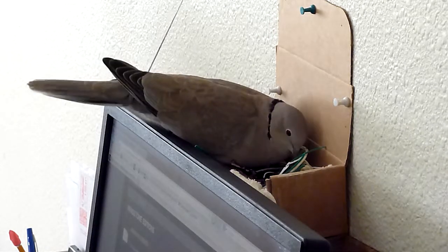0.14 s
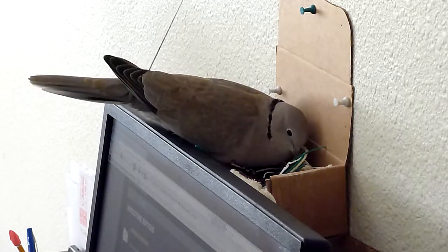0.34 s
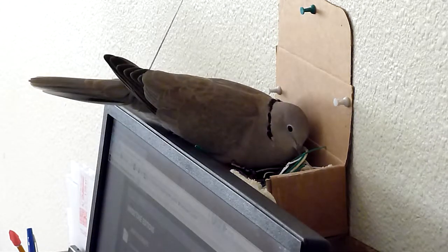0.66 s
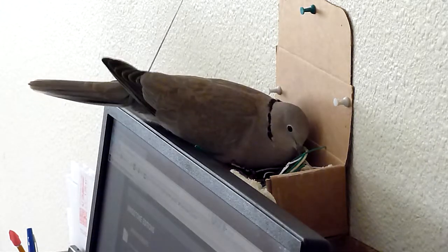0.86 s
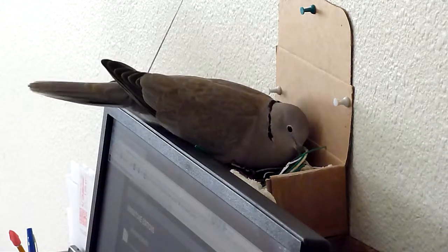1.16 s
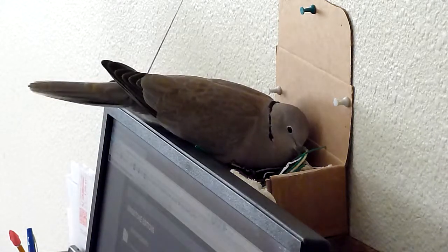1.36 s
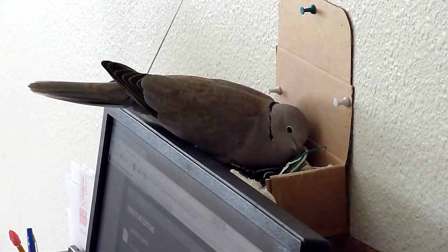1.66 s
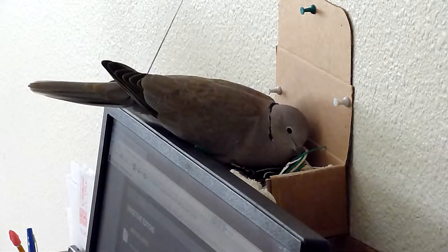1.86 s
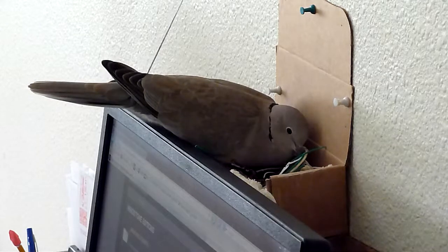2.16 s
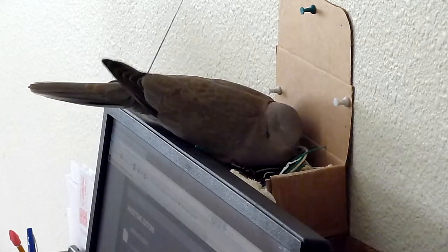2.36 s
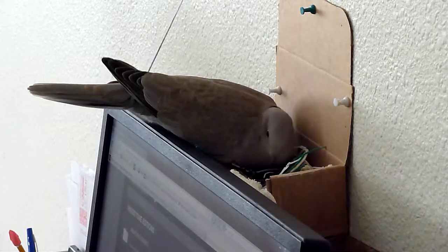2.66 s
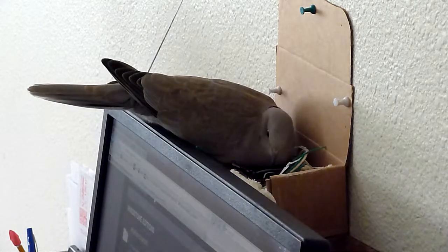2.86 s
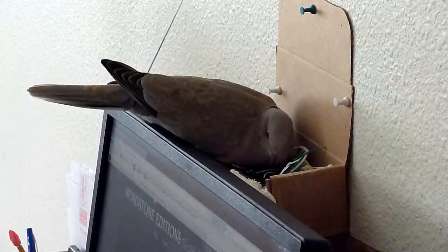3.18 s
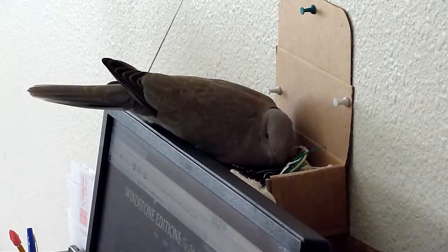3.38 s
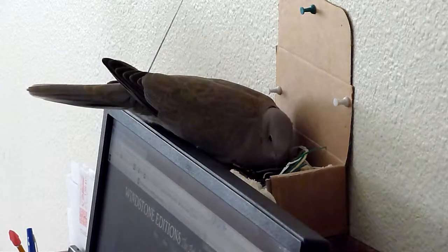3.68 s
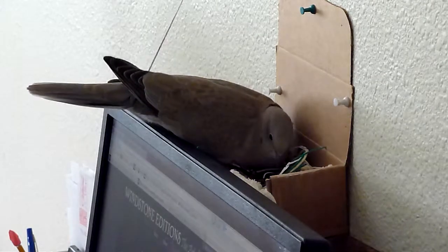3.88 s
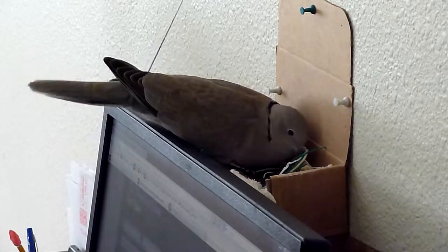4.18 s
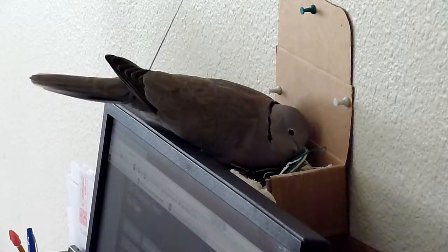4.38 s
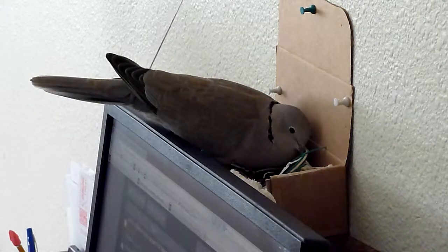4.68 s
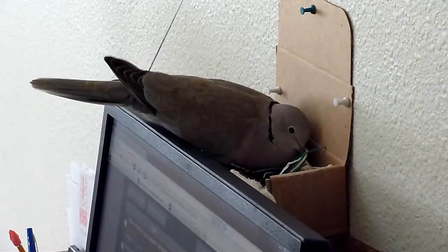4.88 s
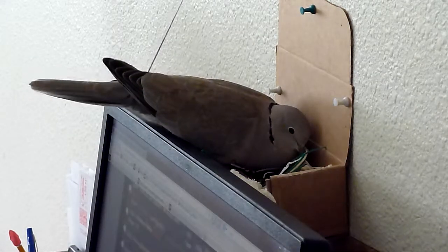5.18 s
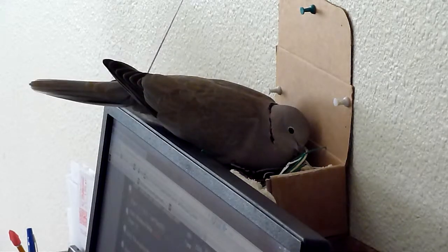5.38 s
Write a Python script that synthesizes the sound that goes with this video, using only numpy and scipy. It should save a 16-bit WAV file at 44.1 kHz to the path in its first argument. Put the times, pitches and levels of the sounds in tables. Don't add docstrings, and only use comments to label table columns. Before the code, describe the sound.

Close stereo sound in a small, hard-walled room with a quiet, steady airy hum and slight hiss. A dove is already cooing at the start: the end of a short note until about 0.1 s, a long held note from 0.15 to 0.75 s, and a short closing note near 1.0 s. The tone is round, hollow and almost pure, around 550 Hz, scooping up at the onset and dropping at the end, its level rippling with echoes and the room ringing briefly afterwards. A mouse button clicks down and up at 0.53 and 0.66 s, again at 1.46 and 1.6 s. Sharper, brighter snaps come at 2.7 and 2.78 s, slightly left, then a barely audible tap at 2.87 s. The hum swells gently around 3.15 s; a dull, more distant knock falls at 3.45 s. The second coo follows: short at 4.0, long from 4.2 to 4.8, short at 5.0 s, then fading ring and hum.

```python
import sys
import numpy as np
from scipy import signal
from scipy.io import wavfile
from scipy.ndimage import uniform_filter1d

SR = 44100
rng = np.random.default_rng(int(sys.argv[2]) if len(sys.argv) > 2 else 0)


def voltage_ratio(level):
    return 10 ** (np.asarray(level, float) / 20)


def unload_wav(signal):
    wavfile.write(
        sys.argv[1],
        SR,
        np.round(np.clip(np.atleast_2d(signal).T, -1, 1) * 32767).astype(np.int16),
    )


N = 244314

# start_s, length_s, level_db, held_pitch_hz, slow_arch_hz
FIRST_SHORTS = [
    (-.07, .168, -13.3, 550, 4),
    (3.977, .159, -13.8, 557, 4),
]
LONG_COOS = [
    (.157, .606, -17.2, 555, 24),
    (4.203, .588, -15.8, 543, 6),
]
LAST_SHORTS = [
    (.965, .139, -13.3, 545, 4),
    (5.01, .128, -13.2, 537, 4),
]
# rise_s, fall_s, end_drop_hz, half_pitch_voice_db
FIRST_SHORT_GLIDE = (.037, .006, 65, -42)
LONG_COO_GLIDE = (.021, .044, 180, -88)
LAST_SHORT_GLIDE = (.0155, .016, 195, -88)
# pitch_multiple, level_db
OVERTONES = [(2, 1), (3, -15), (4, -6.5), (5, -22), (6, -11.5), (8, -19)]
# pitch_multiple, level_db
HALF_TONES = [(.5, -4.5), (1.5, 7), (2.5, -13), (3.5, -22)]
# pitch_hz, width_hz, level_db
THROAT = [(390, 100, -8), (540, 90, 0), (650, 100, 1.5), (950, 300, -19.5)]
# pitch_hz, rising_change_db, falling_change_db, half_width_hz
ECHO_NOTCHES = [(466, -18, -9, 13), (512, -6, -.3, 8), (497, -.3, -11, 5)]
# time_s, change_db, half_width_ms
ECHO_DIPS = [(-.003, -2.5, 4), (.013, 3, 7), (.036, -22, 9), (.057, -8, 13), (.216, 6, 10), (.252, -30, 16),
             (.306, -4.5, 9), (.41, -3.5, 24), (.553, -10, 19), (.607, 4.5, 16), (.637, -14, 5),
             (.668, 3, 16), (.7, 5, 5), (1.026, -13, 5), (1.039, -13, 8), (4.066, -19, 5), (4.086, -10, 11),
             (4.264, 2.5, 12), (4.298, -8, 13), (4.338, 1.5, 14), (4.41, -7.5, 13), (4.468, -4.5, 12),
             (4.514, -2, 6), (4.557, -3, 9), (4.635, 2.5, 18), (4.669, -6, 6), (4.702, 3, 14),
             (4.737, 4, 5), (5.064, 1.5, 8), (5.102, -4, 9)]

# pitch_hz, decay_60db_s, level_db
ROOM_MODES = [(380, .35, -24), (440, .5, -22.5), (522, 1, -18), (545, 0.18, -26.5), (715, 0.18, -14.5)]
# start_s, level_db, pitch_hz, decay_60db_s
BEATING_RINGS = [(.096, -18.5, 536.5, 0.33), (0.094, -37.5, 516.5, 0.74), (.715, -35.5, 537, .5),
                 (.715, -44, 525, 0.53), (1.086, -17.5, 541, 0.28), (1.0869, -35, 536, 0.7),
                 (4.136, -30.5, 536.5, 0.71), (4.136, -31, 545, 0.39), (4.755, -32, 536.3, 0.43),
                 (4.754, -39, 523.5, 0.45), (5.11, -11.5, 523.6, 0.12), (5.1106, -24.5, 533, 0.5)]
# frequency_hz, decay_60db_s
ROOM_DECAY = [(150, 0.41), (500, 0.65), (1200, 0.59), (3000, 0.29), (7000, 0.32), (14000, 0.084)]

# frequency_hz, level_db_per_hz
HUM_COLOR = [(12, -48.5), (20, -18), (172, -9.5), (204, 8), (228, -13), (377, -4), (433, -11.5), (471, -7),
             (606, -9), (947, -10.5), (1030, -9.5), (1180, -11.5), (4050, -18.5), (11100, -26.5),
             (16000, -33)]
# frequency_hz, likeness (1 is identical)
HUM_LIKENESS = [(30, .7), (70, 0.2), (130, 0.5), (290, -0.2), (640, -0.4), (1410, -0.64), (3100, -0.58),
                (6820, -.18), (15000, -0)]
# frequency_hz, left_minus_right_db
HUM_LEAN = [(30, 3.5), (70, 2.5), (200, 2), (700, 0), (1300, -1), (15000, -0.5)]

# start_s, peak_db, pan_db
MOUSE_PRESSES = [
    (.5283, -29.5, -5),
    (1.464, -32.5, -2),
]
MOUSE_RELEASES = [
    (0.6579, -31.5, -7),
    (1.6053, -30.5, -4),
]
MOUSE_SNAPS = [
    (2.6894, -38, -5.5),
    (2.692, -29, -10),
    (2.7745, -27.5, -8),
    (2.7795, -31, 1.5),
]
TAPS = [
    (2.873, -42, 0),
]
KNOCKS = [
    (3.45, -33.5, .5),
]
# pitch_hz, level_db, width_hz
PRESS_SHELL = [(800, -7, 500), (2440, -13, 400), (4000, -13, 1000), (5400, -8, 900), (6500, -14, 1000),
               (7460, 3, 200), (8500, -13, 1500), (11700, -17, 2500), (13100, -14, 800), (15200, -12, 1500)]
RELEASE_SHELL = [(650, -1, 200), (1000, -4, 500), (1600, -7, 500), (2710, -8, 600), (5170, -3, 450),
                 (6070, -9, 900), (7460, -8, 600), (9000, -14, 2000), (11300, -7, 700), (13900, -1, 600),
                 (15400, -7, 1000)]
SNAP_SHELL = [(1400, -17, 600), (3700, -10, 1600), (5800, -6, 1400), (7300, -1, 1200), (8700, 0, 1800),
              (10500, -1, 2200), (12200, -4, 2200), (14600, -6, 2800)]
KNOCK_SHELL = [(120, -11, 90), (226, 0, 90), (360, -3, 160), (540, -3, 260), (800, -8, 400),
               (1300, -10, 600), (2000, -12, 900), (2900, -13, 1000)]


def evened(x):
    return x / np.sqrt(np.mean(x ** 2) + 1e-20)


def bell(x, at, width):
    return np.exp(-.5 * ((x - at) / width) ** 2)


def read(points, hz):
    f, value = np.transpose(points)
    return np.interp(np.log(hz + 1), np.log(f + 1), value)


def add(mix, start_s, sound):
    part = mix[..., round(start_s * SR):][..., :sound.shape[-1]]
    part += sound[..., :part.shape[-1]]


def resonate(x, hz, width_hz):
    pole = np.exp((2j * np.pi * hz - np.pi * width_hz) / SR)
    return 2 * signal.lfilter([1 - abs(pole)], [1, -pole], x).real


def ports(x, pan_db):
    left = x * voltage_ratio(pan_db / 2)
    right = np.roll(x, 7) * voltage_ratio(-pan_db / 2)
    return np.array([left, right])


def room(x, apart, pan_db, damping):
    size = SR // 2
    slots = np.arange(60, size - 20, 20)
    at = slots + rng.integers(0, 20, (3, len(slots)))
    echoes = np.zeros((3, size))
    np.put_along_axis(echoes, at, rng.choice([-1., 1.], at.shape), 1)
    hz, t, z = signal.stft(echoes, SR, nperseg=256)
    fading_db = -60 * t * damping / read(ROOM_DECAY, hz)[:, None]
    early_db = 1.7 * np.exp(-t / 0.037)
    tail = signal.istft(z * voltage_ratio(fading_db + early_db), SR, nperseg=256)[1]
    tail = ports(tail[0], pan_db) + apart * tail[1:]
    return signal.fftconvolve(x[None], tail / np.linalg.norm(tail[0]), axes=1)[:, :N]


def crop_swell(t, hz, late, tiring, level_db, air):
    floor, crop_hz = .075, 535
    steepness = 13 + (5.5 - 13) * late
    crop_gain = np.minimum(hz / crop_hz, 1) ** steepness
    swell = voltage_ratio(level_db) * (floor * (1 - late) + (1 - floor) * crop_gain)
    scatter = air[::-1]
    for _ in range(3):
        scatter = resonate(scatter, 95, 90)
    swell = swell * (1 + (.011 + .085 * tiring) * evened(scatter))
    for at, change_db, width_ms in ECHO_DIPS:
        swell = swell * (1 - (1 - voltage_ratio(change_db)) * bell(t, at, width_ms / 1000))
    for f, up_db, down_db, width_hz in ECHO_NOTCHES:
        notch_db = up_db + (down_db - up_db) * late
        swell = swell * (1 - (1 - voltage_ratio(notch_db)) * bell(hz, f, width_hz))
    return swell


def overtones(turn, hz, flat, tiring):
    flicker = rng.standard_normal((len(turn), 9))
    for _ in range(2):
        flicker = uniform_filter1d(flicker, 700, 0)
    flicker_db = 1.8 * evened(flicker).T
    slack = np.minimum(hz / 546, 1) ** 7 * (1 - .6 * tiring)
    tones = sum(voltage_ratio(db + flicker_db[k]) * slack ** (k - 2) * np.cos(k * turn) for k, db in OVERTONES)
    return voltage_ratio(-56.5 + 12 * flat) * tones


def half_tones(turn, left, level_db):
    tones = sum(voltage_ratio(db) * np.cos(k * turn) for k, db in HALF_TONES)
    return voltage_ratio(level_db) * np.clip((.07 - left) / .025, 0, 1) * tones


def breath(air, flat, tiring):
    rush = sum(voltage_ratio(db) * resonate(resonate(air, f, w), f, w) for f, w, db in THROAT)
    level_db = -49 - 1 * flat + 15 * tiring
    return voltage_ratio(level_db + 3.0) * evened(rush)


def syllable(row, glide):
    start, length, level_db, held_hz, arch_hz = row
    rise_s, fall_s, drop_hz, half_db = glide
    u = np.arange(0, length, 1 / SR)
    t, left = start + u, length - u

    scoop_hz = 195 * np.exp(-u / rise_s)
    arch = arch_hz * (np.exp(-u / .09) + np.exp(-left / .09))
    hz = held_hz - scoop_hz - arch - drop_hz * np.exp(-left / fall_s)
    waver = evened(uniform_filter1d(rng.standard_normal(len(t)), 400))
    turn = 2 * np.pi * np.cumsum(hz * (1 + 0.00071 * waver)) / SR

    late = np.clip(3 * u / length - 1, 0, 1)
    flat = np.clip(1 - hz / held_hz, 0, .2) / .2
    tiring = np.exp(-left / length / .3)
    air = rng.standard_normal(len(t))

    tone = crop_swell(t, hz, late, tiring, level_db, air) * np.cos(turn)
    tone = tone + overtones(turn, hz, flat, tiring) + half_tones(turn, left, half_db)
    sound = np.sqrt(2) * tone + breath(air, flat, tiring)
    fade = np.minimum(1, np.minimum(u / 0.005, left / (.006 + .6 * fall_s)))
    return max(start, 0), (fade * sound)[t >= 0]


def mode_ringing(voice):
    ring = sum(voltage_ratio(db) * resonate(voice, f, 1.53 / t60) for f, t60, db in ROOM_MODES)
    t = np.arange(SR // 2) / SR
    for start_s, db, hz, t60 in BEATING_RINGS:
        fading = voltage_ratio(db - 60 * t / t60) * (1 - np.exp(-t / .004))
        add(ring, start_s, np.sqrt(2) * fading * np.sin(2 * np.pi * hz * t))
    return ring


def dove():
    voice, pan_db = np.zeros(N), 1.8
    kinds = (FIRST_SHORTS, FIRST_SHORT_GLIDE), (LONG_COOS, LONG_COO_GLIDE), (LAST_SHORTS, LAST_SHORT_GLIDE)
    for rows, glide in kinds:
        for row in rows:
            add(voice, *syllable(row, glide))
    top = signal.sosfilt(signal.butter(4, 2500, "high", fs=SR, output="sos"), voice)
    voice = signal.sosfilt(signal.butter(4, 2500, fs=SR, output="sos"), voice)
    ring = mode_ringing(voice)
    haze = voice - 0.8 * resonate(voice, 542, 90)
    return top + ports(voice + ring, pan_db) + voltage_ratio(-7.5) * room(haze, .06, pan_db, 1.14)


def hum():
    frames, hz = N // 256 + 5, np.fft.rfftfreq(1024, 1 / SR)
    a, b, c, d, patches = rng.standard_normal((frames, 513, 5)).T
    patches = evened(uniform_filter1d(uniform_filter1d(patches, 12, 0), 14, 1))
    same = np.clip(read(HUM_LIKENESS, hz), -1, 1)[:, None]
    lean = voltage_ratio(read(HUM_LEAN, hz) / 2)[:, None]
    left = a + 1j * b
    right = same * left + np.sqrt(1 - same ** 2) * (c + 1j * d)
    z = np.array([left * lean, right / lean])
    z *= voltage_ratio(read(HUM_COLOR, hz)[:, None] + 0.98 * patches)
    noise = signal.istft(z, nperseg=1024, noverlap=768)[1][:, :N]
    swell_db = 2.1 * bell(np.arange(N) / SR, 3.15, .35)
    return voltage_ratio(-55 + 4.0 + swell_db) * evened(noise)


def shell_response(shell):
    hz = abs(np.fft.fftfreq(4096, 1 / SR))
    power = sum(voltage_ratio(2 * db) / (1 + ((hz - f) / width) ** 2 * 2) ** 3 for f, db, width in shell)
    log_gain = np.log(power + 1e-9) / 2
    phase = signal.hilbert(log_gain).imag
    return np.fft.ifft(np.exp(log_gain - 1j * phase)).real[:2048]


def strikes(events, shell, wet_db, rattle_s, damping):
    near, bare, t = np.zeros((2, N)), np.zeros(N), np.arange(2000) / SR
    response = shell_response(shell)
    for start_s, peak_db, pan_db in events:
        rattle = rng.standard_normal(len(t)) * t * np.exp(-2 * t / rattle_s)
        ring = signal.fftconvolve(rattle, response)
        ring = voltage_ratio(peak_db) * ring / abs(ring).max()
        add(near, start_s, ports(ring, pan_db))
        add(bare, start_s, response * np.linalg.norm(ring) / np.linalg.norm(response))
    return near + voltage_ratio(wet_db) * room(bare, 1.0, -1.0, damping)


def mouse():
    presses = strikes(MOUSE_PRESSES, PRESS_SHELL, 3.2, 0.0016, 1.0)
    releases = strikes(MOUSE_RELEASES, RELEASE_SHELL, 3.5, 0.006, 0.98)
    snaps = strikes(MOUSE_SNAPS, SNAP_SHELL, 3.5, 0.0006, 1.1)
    return presses + releases + snaps


def set_down():
    tap = strikes(TAPS, KNOCK_SHELL, -7.0, 0.0011, 1.4)
    knock = strikes(KNOCKS, KNOCK_SHELL, 7, .016, 1.15)
    return tap + knock


def scene():
    return dove() + hum() + mouse() + set_down()


def roll_off(x):
    return signal.sosfilt(signal.butter(12, 16100, fs=SR, output="sos"), x)


def record(dry):
    return roll_off(dry)


dry = scene()
out = record(dry)
unload_wav(out)
```